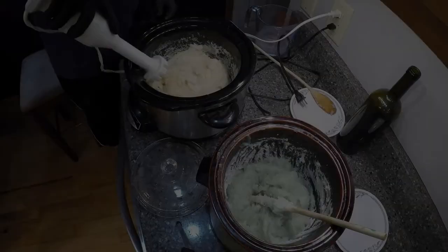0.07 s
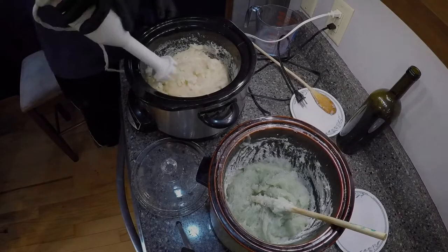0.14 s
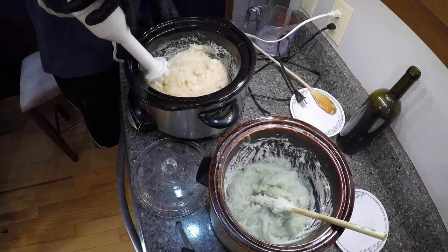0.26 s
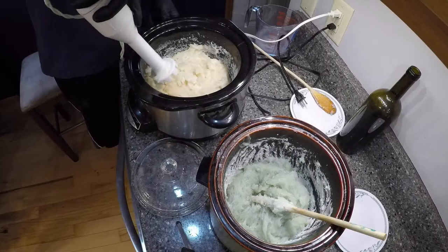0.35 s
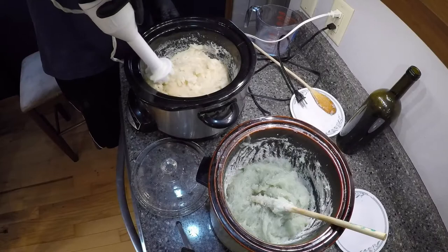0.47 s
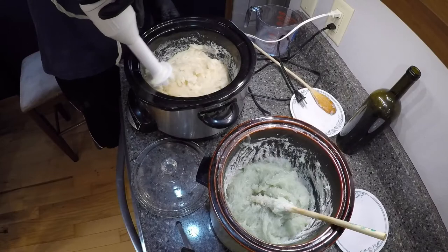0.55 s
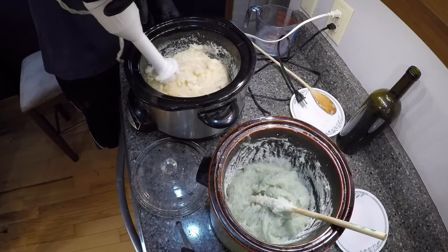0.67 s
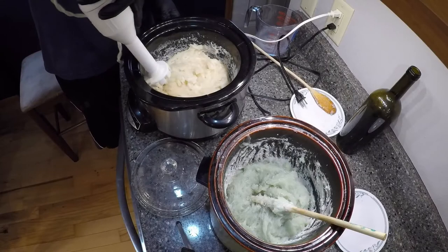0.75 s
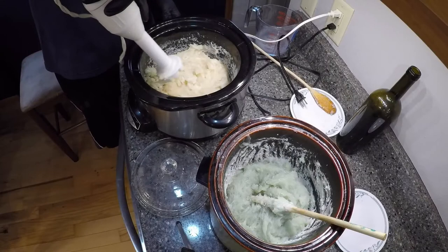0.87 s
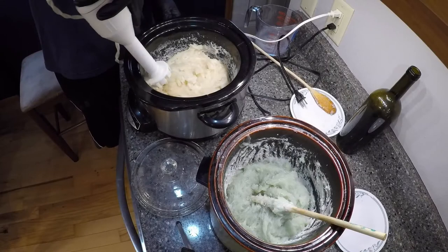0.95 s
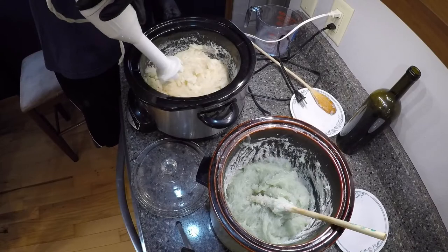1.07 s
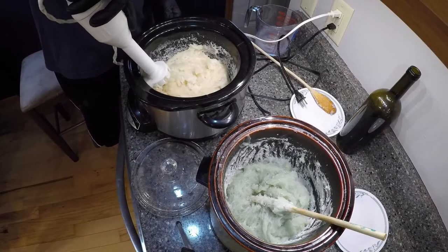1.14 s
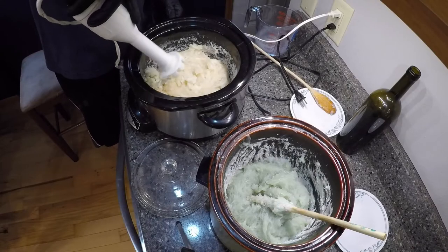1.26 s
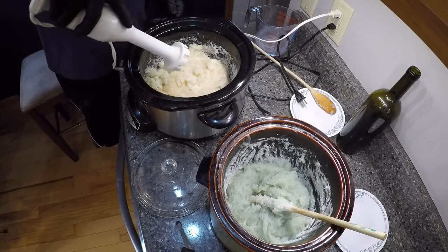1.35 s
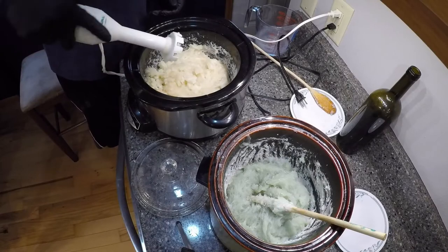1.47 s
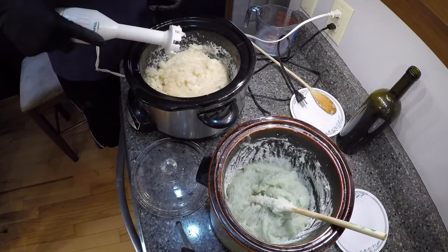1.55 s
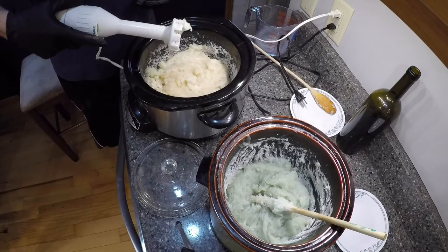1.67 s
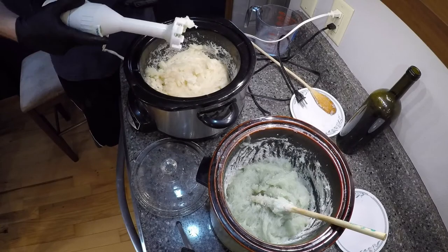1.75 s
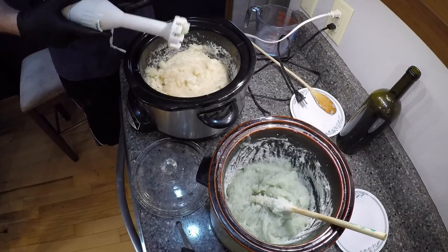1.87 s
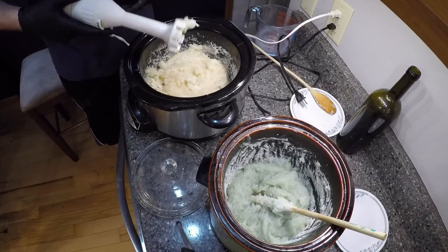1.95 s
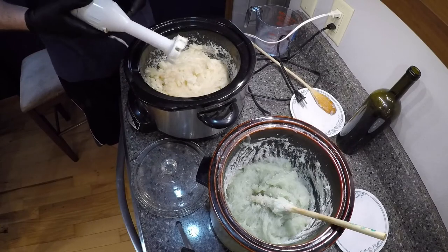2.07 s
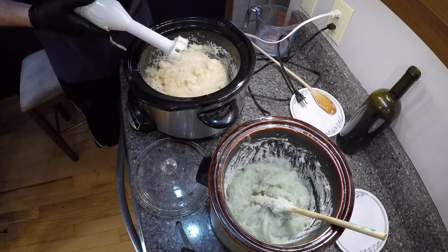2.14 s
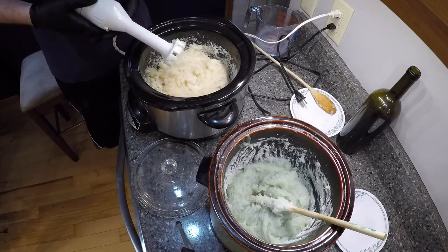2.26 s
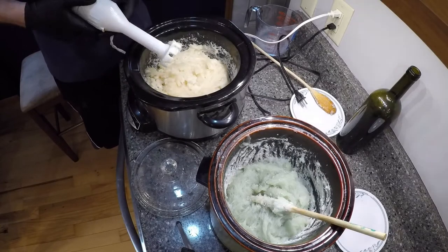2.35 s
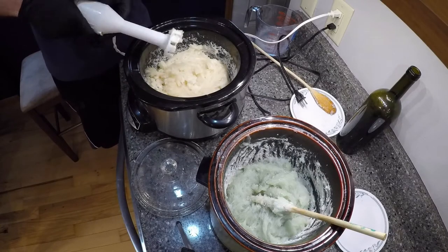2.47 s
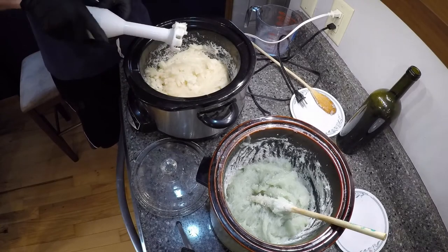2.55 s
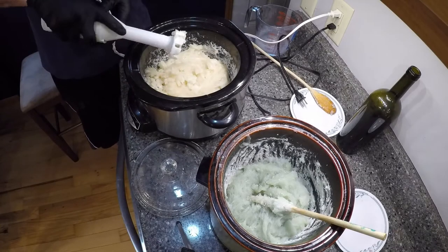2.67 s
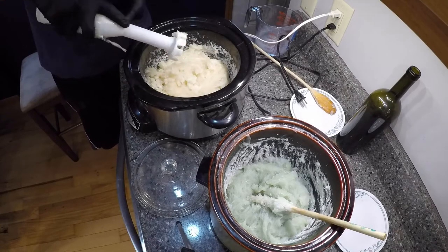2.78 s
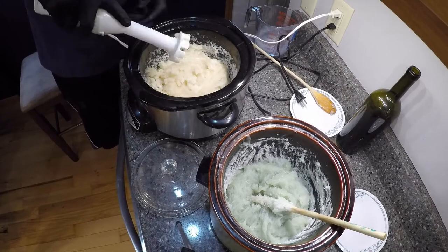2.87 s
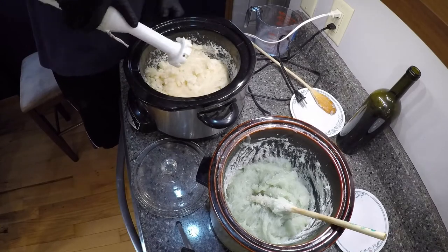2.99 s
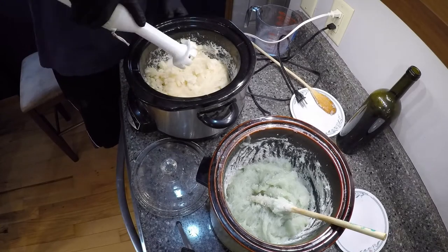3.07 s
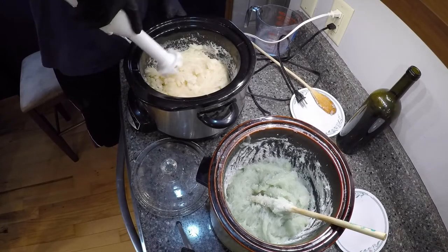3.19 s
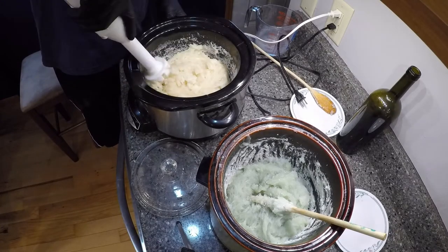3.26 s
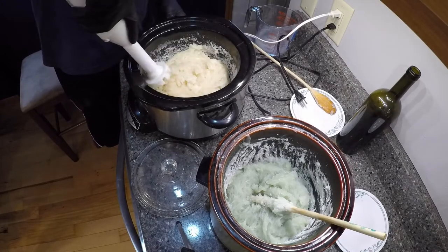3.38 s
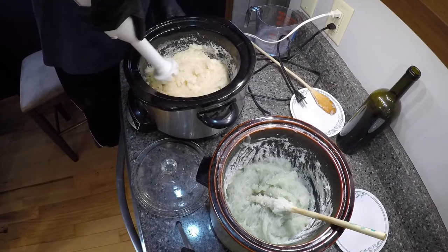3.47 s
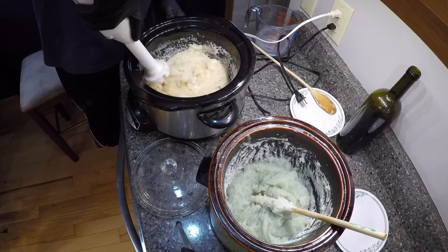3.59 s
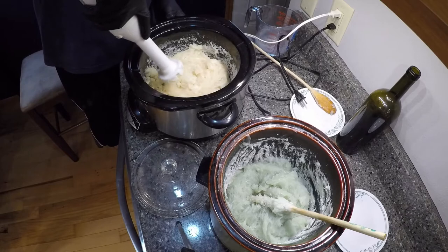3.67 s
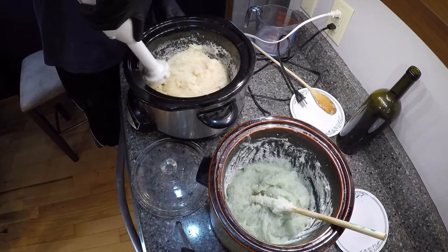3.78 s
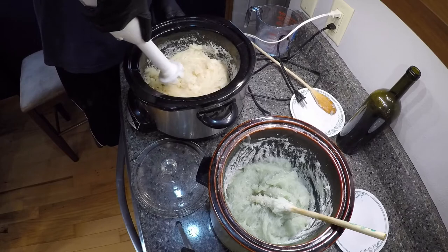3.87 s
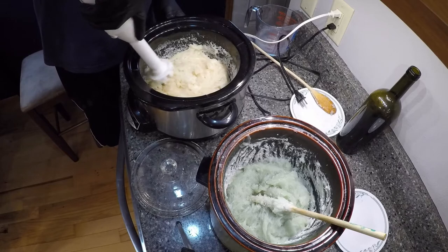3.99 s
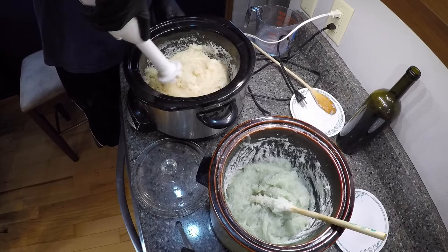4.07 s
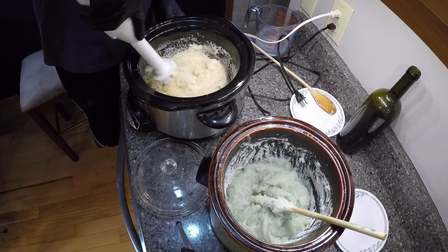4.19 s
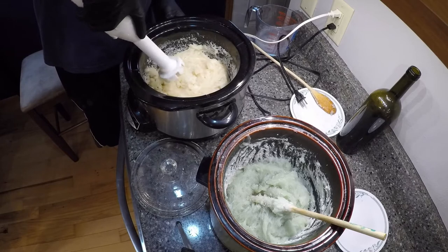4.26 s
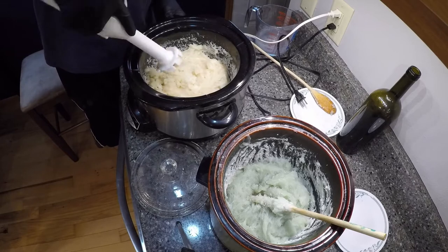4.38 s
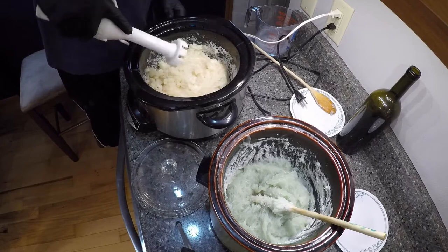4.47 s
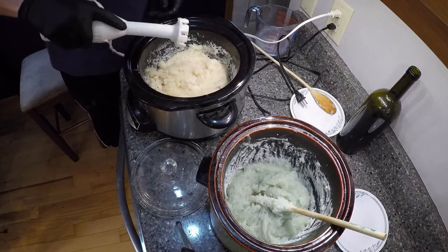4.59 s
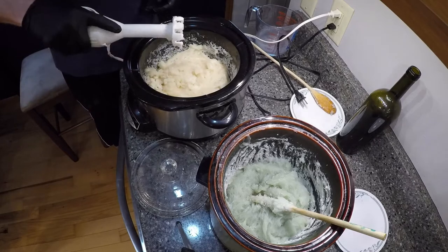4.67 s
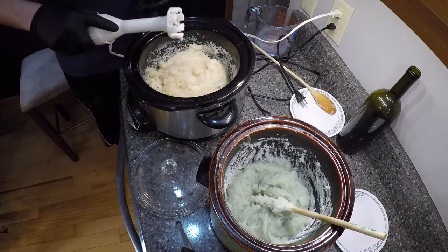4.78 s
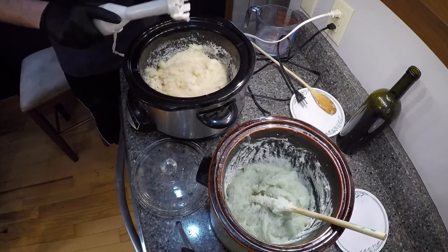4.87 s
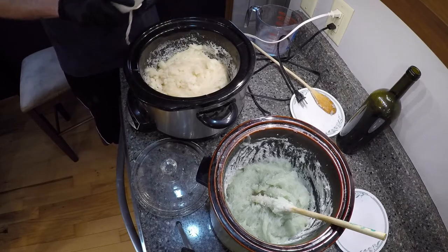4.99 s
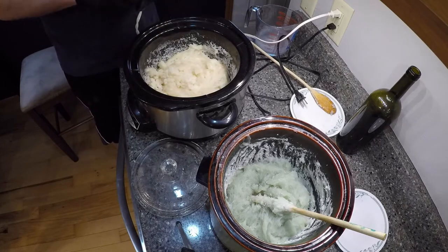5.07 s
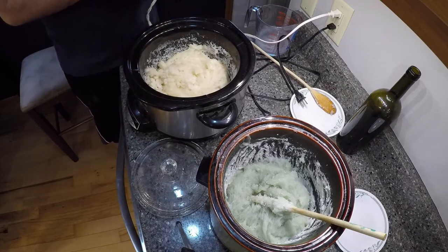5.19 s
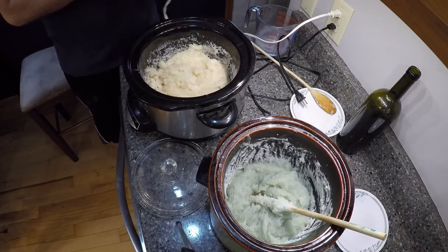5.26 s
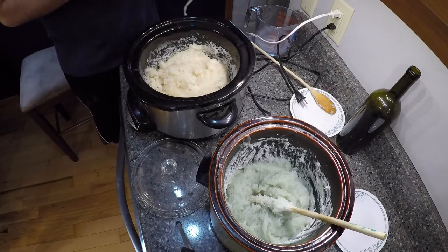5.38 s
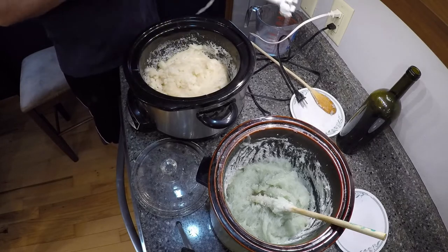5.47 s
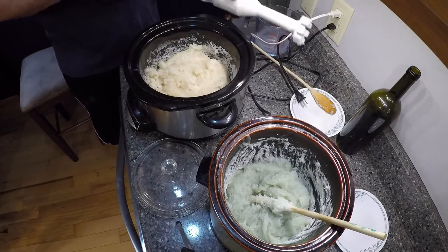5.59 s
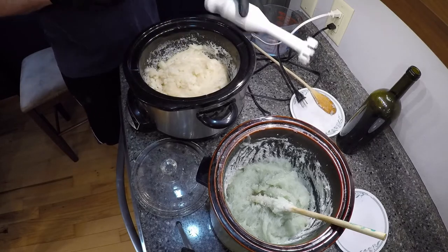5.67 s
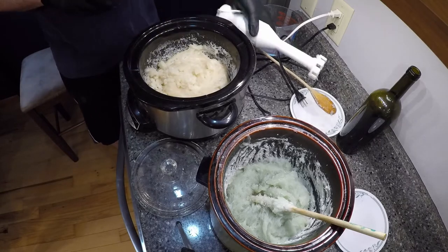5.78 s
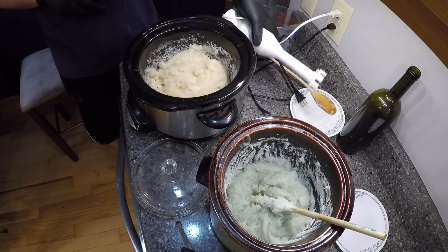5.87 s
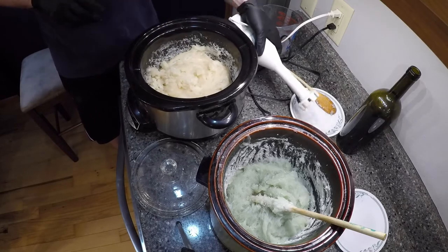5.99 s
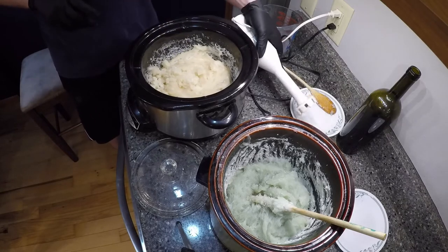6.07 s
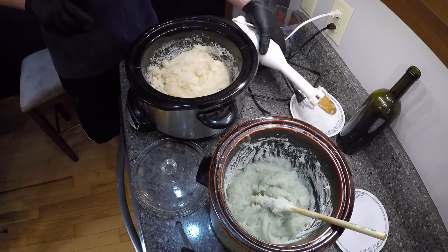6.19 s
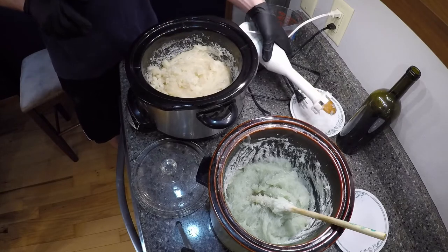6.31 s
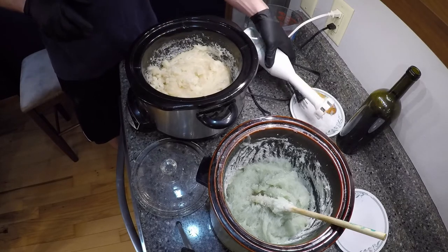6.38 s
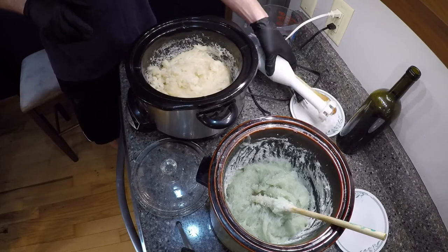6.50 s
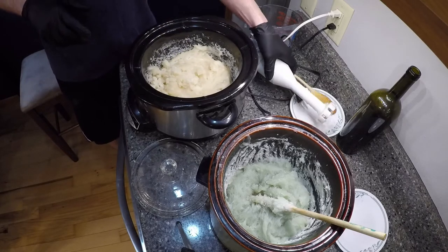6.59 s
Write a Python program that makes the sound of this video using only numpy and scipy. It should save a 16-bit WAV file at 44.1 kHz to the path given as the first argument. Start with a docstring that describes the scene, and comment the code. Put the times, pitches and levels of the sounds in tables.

```python
"""Over a low room hum, a plastic stick blender is knocked clean on the rim of a stoneware pot, in two bursts.
Light taps and rustling cloth and gloves fill the gaps; a bit of metal is brushed and the blender laid down.
Blows are decaying sine modes over filtered noise bursts, and noise tails let the kitchen answer them.
The counter carries the blows into the mount, which shakes the two microphones in opposite sense.
Hum and rustle are coloured noise; a gain control then ducks everything above the bass on loud sounds."""
import sys
import numpy as np
from scipy import signal
from scipy.fft import rfft, irfft
from scipy.io import wavfile
from scipy.ndimage import uniform_filter1d

SR = 44100
rng = np.random.default_rng(int(sys.argv[2]) if len(sys.argv) > 2 else 0)


def to_wav(sig):
    """Store sig (one row per channel, or 1-D mono) as 16-bit WAV at the path in sys.argv[1].

    Samples outside -1..1 are clipped; the rate is SR.
    """
    pcm = np.clip(np.atleast_2d(sig), -1, 1) * 32767
    pcm = np.round(pcm).astype(np.int16)
    wavfile.write(sys.argv[1], SR, pcm.T)  # frames by channels


N = 292723

# Blows on the rim. Each row: start in seconds, strongest rim modes in dB, peak in dB, left over right in dB,
# send to the walls in dB against the peak, brightness of that send in dB an octave,
# thump of the pot on the counter in dB, jolt of the mount in dB, wobble of the mount in dB.
KNOCKS = [(0.065, -8.5, -9.5, 2.5, 2, 0.5, -31, -25.5, -25.5),
          (0.233, -1, -6, 5, 8, 0.1, -23.5, -17.5, -20.5), (0.385, -0.5, -6, 7.5, 10, 0.7, -24.5, -14, -28),
          (0.561, 1.5, -4.5, 4.5, 8.5, 0.76, -23, -13, -29), (0.747, -1, -3, 4.5, 7, 0.6, -24, -12, -25),
          (0.946, -1.5, -4, 4.5, 8.5, 1.3, -22.5, -13.5, -20),
          (1.127, -1, -3.5, 5, 8, 1.4, -21, -10.5, -18), (3.243, -2.5, -7, 4.5, 8.5, 0.4, -35, -19, -54),
          (3.382, 1.5, -3.5, 3.5, 8.5, 0.4, -41, -13, -52),
          (3.567, -0.5, -4.5, 3, 11.5, 0.6, -39, -13.5, -50),
          (3.742, -1, -3.5, 3.5, 10, 0.9, -42, -15.5, -48), (3.923, -0.5, -3, 4.5, 9.5, 0.4, -48, -19, -32),
          (4.111, -1, -3.5, 3, 9, 0.7, -36, -20, -28)]
# The heavy end lands on the counter, then settles. Each row: start in seconds, peak in dB,
# left over right in dB, contact noise in dB against the ring, send to the walls in dB against the peak,
# counter thump in dB, jolt in dB, wobble in dB.
LANDING = [(5.656, -9.5, 2.5, 8, 8, -39, -4.5, -38), (5.731, -27.5, 2, -14, -12, -34, -40, -50),
           (5.984, -32, 2, 2, 8.5, -23, -8, -14.5)]
# Restless bass between blows. Each row: time in seconds, wobble in dB, rumble common to both sides in dB.
SWAY = [(0, -52, -51.5), (1.3, -34, -51), (1.6, -52, -49.5), (2.24, -62.5, -57.5), (2.8, -68, -66),
        (3.3, -53, -73), (4.4, -53, -58.5), (4.8, -64, -63.5), (5.5, -79, -71), (6.0, -55, -42.5),
        (6.64, -48, -53.5)]
# Spectrum of wobble and rumble. Each row: frequency in Hz, level in dB per Hz.
DEEP = [(15, 0.5), (35, -1), (62, 6.5), (90, -6.5), (108, 3), (200, -84)]
# Spectrum of a light contact. Each row: frequency in Hz, level in dB per Hz.
TICK = [(300, -14), (1000, 3), (2500, 4.5), (4800, -1.5), (6500, 0.5), (8500, -14.5), (12000, -26),
        (16000, -41)]


def amp(db):
    """Turns dB into a linear gain."""
    return 10 ** (np.asarray(db) / 20)


def evened(x):
    """Scales a signal to rms 1."""
    return x / np.sqrt(np.mean(x ** 2) + 1e-20)


def read(table, hz, axis=1):
    """Reads one column of a spectrum at the given frequencies, interpolating over log frequency."""
    table = np.array(table)
    return np.interp(np.log(hz + 1), np.log(table[:, 0] + 1), table[:, axis])


def follow(table, axis):
    """Reads one column of a level curve as a gain for every sample."""
    table = np.array(table)
    return amp(np.interp(np.arange(N) / SR, table[:, 0], table[:, axis]))


def add(mix, s, db, sound, pan_db=0):
    """Adds a two-row sound at s seconds, the peak of its channel mean brought to db before panning."""
    part = mix[:, round(s * SR):][:, :sound.shape[1]]
    gain = amp(db + pan_db * np.array([[.5], [-.5]]))
    part += gain * sound[:, :part.shape[1]] / abs(sound.mean(0)).max()


def coloured(table, size, channels=1):
    """Noise of rms 1 with the given spectrum."""
    z = rfft(rng.standard_normal((channels, size)))
    gain = amp(read(table, np.fft.rfftfreq(size, 1 / SR)))
    return evened(irfft(z * gain, size))


def click(table):
    """A causal, minimum-phase click with the given spectrum and energy 1."""
    level_db = np.maximum(read(table, np.fft.rfftfreq(4096, 1 / SR)), -100)
    half = np.log(amp(level_db))
    full = np.concatenate([half, half[-2:0:-1]])
    minimum_phase = np.exp(signal.hilbert(full).conj())
    shape = np.fft.ifft(minimum_phase).real[None, :2048]
    return shape / np.linalg.norm(shape)


def ringing(modes, size, rise, spread_db=0.3, apart=0.68):
    """Decaying modes struck together, a little apart in phase at each microphone."""
    hz, db, t60 = np.transpose(modes)[:, :, None]
    level, phase, other = rng.standard_normal((3, len(modes), 1))
    t = np.arange(size) / SR
    decay_db = 60 * t / np.clip(t60, .01, .35)
    level = amp(db + spread_db * level - decay_db)
    ring = [(level * np.sin(2 * np.pi * hz * t + 1.03 * phase + side * apart * other)).sum(0)
            for side in (0, 1)]
    return np.array(ring) * (1 - np.exp(-t / rise)) ** 2


def tilted(table, treble_db):
    """Brightens a spectrum or a set of modes by so many dB an octave, pivoting at 2 kHz."""
    return [(hz, db + treble_db * np.log2(hz / 2000), *rest) for hz, db, *rest in table]


def blow(modes, colour, crack_db, crack_t60, size=12000):
    """A modal ring over a decaying burst of contact noise, partly shared by both sides."""
    noise = rng.standard_normal((3, size))
    fade = amp(-60 * np.arange(size) / SR / crack_t60)
    burst = (noise[0] + 1.37 * noise[1:]) * fade
    crack = signal.oaconvolve(burst, click(colour), axes=1)[:, :size]
    return ringing(modes, size, 0.00029) + amp(crack_db) * crack


def hum():
    """The steady floor of house and microphones: coloured noise, swelling a little, and wavering tones."""
    # Spectrum common to both sides. Each row: frequency in Hz, level in dB per Hz.
    mid_colour = [(59, -40.5), (100, -27), (140, 0), (335, -4), (558, -9), (768, -17.5), (1030, -17.5),
                  (2630, -24.5), (3400, -24), (4570, -28.5), (5300, -24.5), (7290, -26.5), (12100, -36),
                  (14100, -41), (16000, -74)]
    # Spectrum opposed between the sides. Each row: frequency in Hz, level in dB per Hz.
    side_colour = [(35, -44), (60, -18), (91, -14.5), (172, -0.5), (1250, -13), (3040, -29.5), (3670, -35),
                   (4030, -44), (4750, -32), (7230, -26.5), (12400, -38), (14600, -48), (16000, -62)]
    # A far appliance. Each row: frequency in Hz, rms level in dB.
    drone = [(118.4, -72), (150.7, -61.5), (317.6, -62.5)]
    mid_db, side_db = -50.5, -48
    swell = amp(evened(uniform_filter1d(rng.standard_normal((2, N)), 3000)))  # 1 dB rms
    mid = amp(mid_db) * coloured(mid_colour, N)[0] * swell[0]
    for hz, db in drone:
        waver = 1 + 0.0046 * evened(uniform_filter1d(rng.standard_normal(N), 8000))
        mid = mid + amp(db) * np.sqrt(2) * np.sin(2 * np.pi * hz * np.cumsum(waver) / SR)
    side = amp(side_db) * coloured(side_colour, N)[0] * swell[1]
    return np.array([mid + side, mid - side])


def shakes():
    """Everything that shakes the mount, as rows of time, jolt and wobble."""
    # Bumps on the counter that only shake the mount. Each row: start in seconds, jolt in dB, wobble in dB.
    bumps = [(1.676, -24, -44), (2.207, -26, -48), (2.929, -29, -38), (2.999, -22.5, -58),
             (4.643, -26, -62), (4.763, -33, -63.5), (5.517, -22.5, -65), (5.674, -18, -43),
             (5.711, -23, -23), (5.828, -28, -32), (5.865, -31.5, -30), (6.039, -30, -15.5),
             (6.147, -35, -36), (6.3, -54, -36), (6.411, -50, -39)]
    return [(row[0], *row[-2:]) for row in KNOCKS + LANDING + bumps]


def settling(rest, rise_s, t60, gain_db=0):
    """A level that swells after every shake and dies back to its rest, summed as power."""
    clock = np.arange(0, N, 32) / SR  # every 32 samples is fine enough
    s, _, wobble_db = np.transpose(shakes())[:, :, None]
    t = np.maximum(clock - s, 0)
    swing = amp(wobble_db + gain_db - 60 * t / t60) * (1 - np.exp(-(t / rise_s) ** 2))
    power = (swing ** 2).sum(0)
    return np.sqrt(rest ** 2 + np.interp(np.arange(N) / SR, clock, power))


def wobble():
    """The mount swings out after a blow and settles: deep noise under a swelling level."""
    level = settling(follow(SWAY, axis=1), rise_s=0.018, t60=0.53)
    return coloured(DEEP, N) * level * amp([[-1.4], [1.4]])  # right side stronger


def rumble():
    """The share of the deep noise common to both microphones, quicker to rise and settle."""
    return coloured(DEEP, N) * settling(follow(SWAY, axis=2), rise_s=0.0072, t60=0.15, gain_db=-17)


def jolts():
    """Blows reach the mount through the counter; its modes swell over a few cycles and ring out."""
    # Ring of the mount. Each row: frequency in Hz, level in dB, t60 in seconds.
    mount_modes = [(248.3, 9.5, 0.065), (194.4, -8.5, 0.24), (155.7, -4, 0.12), (558, 1, 0.038)]
    lag_s = 0.00812
    out = np.zeros((2, N))
    for s, jolt_db, _ in shakes():
        add(out, s + lag_s, jolt_db, ringing(mount_modes, 16000, 0.009, apart=0.22), -.8)
    return out


def mount():
    """Jolts and wobble shake the two microphones in opposite sense; rumble moves both alike."""
    return (jolts() + wobble()) * [[1], [-1]] + rumble()


def struck(burst, pair_db):
    """The pot's modes as one blow wakes them: each lands elsewhere, so levels and pitches scatter."""
    # Rim and shaft ringing. Each row: frequency in Hz, level in the first burst in dB,
    # level in the second burst in dB, t60 in seconds (ringing holds it at 0.35 or less).
    pot_modes = [(454, -9.5, -13, 0.11), (502, -9, -12, 0.088), (536, -12, -4.5, 0.081),
                 (590, -27, -21, 0.37), (774, -12.5, -15, 0.18), (857, -23, -21, 0.36),
                 (930, -30, -23, 0.33), (971, -6.5, -11.5, 0.074), (1030, -15, -13, 0.092),
                 (1242, -13, -6.5, 0.053), (1397, -14.5, -11.5, 0.16), (1621, -22, -3, 0.04),
                 (1833, -24, -3, 0.072), (2144, 5, 0, 0.046), (2321, 5, 5, 0.038), (2510, -40, -5.5, 0.053),
                 (2640, -3, -21, 0.024), (3200, -9.5, -30, 0.046), (3417, -6, -11, 0.037),
                 (3595, -6.5, -8, 0.042), (3804, -10, -7, 0.0383), (4597, -10.5, -11.5, 0.027),
                 (6080, -11, -21, .06), (6984, -11, -11.5, 0.036), (7515, -4.5, -4, 0.012)]
    spread_db, detune = 1.0, .002  # standard deviations; detune is a fraction of the pitch
    pair_low_hz, pair_high_hz = 2000, 2550  # where the strongest rim modes lie
    level, tune = rng.standard_normal((2, len(pot_modes)))
    modes = []
    for row, a, b in zip(pot_modes, level, tune):
        boost_db = pair_db * (pair_low_hz < row[0] < pair_high_hz)
        modes.append((row[0] * (1 + detune * b), row[1 + burst] + spread_db * a + boost_db, row[3]))
    return modes


def knocks(direct, sent):
    """Rim blows: ring and contact noise, brighter when harder, and the pot bouncing on its feet."""
    # Contact noise. Each row: frequency in Hz, level in dB per Hz.
    crack = [(260, -31), (450, -18), (1260, -3.5), (2330, -4.5), (3050, -27), (3700, -8), (5060, -19.5),
             (5970, -3), (7580, -22), (10000, -28), (13400, -46.5), (16000, -43)]
    # The pot bouncing on its feet. Each row: frequency in Hz, level in dB, t60 in seconds.
    feet = [(177.7, 10.5, 0.024), (101, -8.5, 0.11)]
    # Sent to the walls, one spectrum for each burst, as the shaft meets the rim elsewhere.
    # Each row: frequency in Hz, level in dB per Hz.
    wash = [(210, -43), (350, -23.5), (404, -2.5), (575, -2.5), (696, -17), (830, -5.5), (1040, -12.5),
            (1570, -2), (2200, -4.5), (2580, -10.5), (3180, -8), (3650, -11), (3900, -13.5), (4500, -19.5),
            (6300, -14.5), (7800, -20.5), (8700, -25), (12600, -38), (16000, -69)], [(210, -26.5),
            (350, -11.5), (411, -7.5), (530, -7), (584, -1), (685, -14.5), (885, -5.5), (1260, -9),
            (2200, -2.5), (2580, -10), (3000, -10.5), (3350, -6.5), (3650, -11.5), (3900, -14), (4600, -19),
            (6330, -16), (7800, -19.5), (8700, -25.5), (12600, -39), (16000, -77)]
    for s, pair_db, db, pan_db, wet_db, bright_db, thump_db, *_ in KNOCKS:
        burst = int(s > 2)
        treble_db = 3 + 0.4538 * db  # dB an octave
        modes = tilted(struck(burst, pair_db), treble_db)
        add(direct, s, db, blow(modes, tilted(crack, treble_db), -2, .018), pan_db)
        add(direct, s + 0.00341, thump_db, ringing(feet, 8000, 0.0044, apart=0.11))
        add(sent, s, db + wet_db, click(tilted(wash[burst], bright_db)))


def kitchen(x):
    """Four noise tails, each band dying at its own speed, fade into one another in a repeating cycle."""
    # Each row: frequency in Hz, level in dB, t60 in seconds, left-right likeness from 0 to 1.
    room = [(191, 10, 0.16, 0.83), (362, 8.5, 0.31, 0.85), (480, -1.5, 0.56, 1), (800, 5.5, 0.51, 0.011),
            (1180, 4.5, 0.48, 0.4), (1590, 1.5, 0.45, 0.57), (2340, 3.5, 0.42, 0.27), (3300, 1, 0.44, 0.76),
            (4100, -1, 0.44, 0.74), (6500, 4.5, 0.43, 0.044), (11700, 3.5, 0.27, 0)]
    tails, tails_per_s = 4, 5.3  # cycling through the tails varies the echo
    hz, t, z = signal.stft(rng.standard_normal((2, tails, SR // 2)), SR, nperseg=256)
    same = np.clip(read(room, hz, axis=3), -1, 1)[:, None]
    z = np.array([z[0], same * z[0] + np.sqrt(1 - same ** 2) * z[1]])
    decay_db = 60 * t / read(room, hz, axis=2)[:, None]
    tail = signal.istft(z * amp(read(room, hz)[:, None] - decay_db), SR, nperseg=256)[1]
    tail *= np.clip((np.arange(tail.shape[2]) / SR - .003) / 0.0019, 0, 1)  # first walls answer late
    turn = np.arange(N) * tails_per_s / SR - np.arange(tails)[:, None]
    away = abs(turn % tails - tails / 2)
    feed = x.mean(0) * np.cos(np.pi / 2 * np.minimum(away, 1))
    return signal.fftconvolve(feed[None], tail / np.linalg.norm(tail[0, 0]), axes=2).sum(1)[:, :N]


def faint_taps():
    """Ticks too faint to point at, scattered in time, pitch and strength, as rows like those of taps."""
    count, middle_db, low_hz, high_hz = 12, -49, 1200, 3600
    rows = []
    for when, size, pitch in rng.random((count, 3)):
        db = middle_db + 4.8 * (size - .5)
        hz = low_hz * (high_hz / low_hz) ** pitch
        rows.append((when * N / SR, db, hz, 1.5, -11, 0.025, -2.5, 1.5))
    return rows


def taps(direct, sent):
    """Small taps, bounces and scuffs: one short mode over a burst of light contact noise."""
    # Each row: start in seconds, peak in dB, ring in Hz, left over right in dB, ring in dB,
    # contact t60 in seconds, send to the walls in dB against the peak, brightness in dB an octave.
    tap_rows = [(0.337, -19.5, 1820, 0, -16, 0.1, 6, -1), (0.503, -22.5, 1580, -1, -5, 0.07, 7, -3),
                (0.578, -15.5, 1460, 1, 10, 0.018, -3, 0.1), (1.5447, -50, 2070, -17, -15, 0.031, -29.5, 7),
                (1.766, -41.5, 3580, 2, -11, .012, -3, 3), (2.066, -42.5, 2370, 0, -10, .012, -3, -2),
                (2.106, -43, 1850, 7, -19, 0.023, -3, -4), (2.459, -46, 3300, 2, -10, .012, -3, 1.5),
                (2.486, -42, 6200, 9, -5, 0.04, 16, 1.5), (2.63, -23.5, 1840, 7, -8, 0.042, 4, 1.5),
                (2.64, -33.5, 1790, 9, 14, .015, -3, -1), (2.802, -47, 5600, 5, -10, .015, -3, 1.5),
                (2.865, -47.5, 5770, 6, -16, .015, -1, 2), (2.972, -45, 3300, 1.5, -19, 0.014, -5, 7),
                (3.0008, -38.5, 3180, 0, -13, 0.02, 10, -3),
                (3.0246, -26.5, 2820, 1.5, -16, 0.054, 7, -0.5), (3.211, -41, 3000, 1.5, -12, .015, 6, 3),
                (4.482, -46, 6000, 1.5, -12, .012, -3, 15), (4.594, -31, 3160, 0, -15, 0.0096, 0, 6.5),
                (4.655, -45, 2310, 1.5, -5, .015, -5, -6), (4.687, -51, 2520, 1.5, -12, .012, -3, -1.5),
                (4.811, -44, 6200, 1.5, -15, 0.011, -3, 12), (4.918, -41.5, 2320, 2.5, -10, 0.065, 12, -3),
                (4.94, -42, 6600, 2.5, -14, 0.02, -2, 3), (4.966, -31, 1610, 4, -8.5, 0.03, -3, 4),
                (5.365, -43, 1220, -2, -6, 0.025, -3, 0), (5.46, -42, 1954, 2, -4, 0.02, 10, -3.5),
                (5.4605, -47, 3300, 0, 3, .012, -3, -2), (5.482, -46, 1810, 4, -2, 0.014, -3, -7),
                (5.526, -42.5, 1460, -1.5, -6, 0.028, 9, -10.5), (5.529, -48, 2150, -1.5, 0, 0.015, -3, -5),
                (5.6114, -38, 1180, 4, -4, 0.033, -3, 2), (5.618, -33, 1690, 4, -17, 0.043, 12.5, 0),
                (5.6605, -15, 2100, 2, -6, 0.018, -7, -0.5), (5.664, -20, 1620, 3, -5, 0.014, -8, 1.5),
                (5.832, -34.5, 2710, 1, -2, 0.045, -3, -2.5), (5.953, -47, 3950, -1, -3, .03, -3, 0),
                (5.962, -46, 3650, 1, -3, .03, -3, -1.5), (5.969, -41, 3400, -1, 0, 0.04, 2, -4)]
    ring_t60 = 0.028  # seconds
    for s, db, hz, pan_db, ring_db, contact_t60, wet_db, bright_db in tap_rows + faint_taps():
        colour = tilted(TICK, bright_db)
        tap = blow([(hz, ring_db, ring_t60)], colour, -12.5, np.clip(contact_t60, .004, .3))
        add(direct, s, db, tap, pan_db)
        add(sent, s, db + wet_db, click(colour))


def rustle():
    """Cloth and gloves: clumped grains of noise under strokes that swell and fade."""
    # Each row: loudest moment in seconds, peak in dB, swell in seconds, fade in seconds.
    strokes = [(1.9, -60.5, 0.58, 0.083), (2.25, -55.5, 0.19, 0.093), (2.5, -54, 0.26, 0.11),
               (2.66, -48.5, 0.082, 0.11), (3.05, -60, 0.33, 0.11), (4.63, -65, 0.16, 0.16),
               (5.11, -53.5, 0.091, 0.091), (5.17, -56, 0.05, .05), (5.235, -46.5, 0.057, 0.051),
               (5.36, -64, 0.11, 0.4)]
    # Spectrum of cloth. Each row: frequency in Hz, level in dB per Hz.
    cloth = [(590, -21), (1000, -1), (1110, -33), (2030, -8.5), (3710, 0), (4710, -4.5), (7060, 1.5),
             (12000, -19), (15600, -52), (22000, -120)]
    stroke_db = -13.5  # how far a stroke is down one swell before and one fade after its peak
    grain = amp(2.5 * evened(uniform_filter1d(rng.standard_normal(N), 400)))
    noise = coloured(cloth, N, channels=3)
    t = np.arange(N) / SR
    power = 0
    for s, db, swell, fade in strokes:
        power = power + amp(db + stroke_db * np.maximum((s - t) / swell, (t - s) / fade)) ** 2
    return evened((noise[0] + noise[1:]) * grain) * np.sqrt(power)


def after_ring(direct):
    """One tap leaves a lower part ringing in its own modes."""
    # Each row: start in seconds, peak in dB, left over right in dB.
    rings = [(3.0271, -27.5, 1.9)]
    # Its ring. Each row: frequency in Hz, level in dB, t60 in seconds.
    low_part = [(1340, -13, .13), (1420, -12, .17), (1500, -7, .2), (1600, -6, .06), (1720, -2, .04),
                (1880, -3, .045), (2160, -5, .045)]
    for s, db, pan_db in rings:
        add(direct, s, db, ringing(low_part, 9000, 0.0013), pan_db)


def clink(direct):
    """A thin piece of metal is brushed and rings in high modes until a touch stops it."""
    # Each row: start in seconds, peak in dB, left over right in dB.
    brushes = [(5.419, -39, 10), (5.4275, -56, 8.9)]
    # Its ring. Each row: frequency in Hz, level in dB, t60 in seconds.
    metal = [(2740, -17, 0.28), (6380, -0.5, 0.24), (6560, -9, .07), (7240, -10, .12), (8120, -15.5, .25),
             (9300, -20, .08)]
    damped_s, damping_s = 0.068, 0.006  # touch after the brush, and its time constant
    for s, db, pan_db in brushes:
        touched_for = np.maximum(np.arange(12000) / SR - damped_s, 0)
        add(direct, s, db, blow(metal, TICK, -14.0, .02) * np.exp(-touched_for / damping_s), pan_db)


def landing(direct, sent):
    """The blender is laid down: its body rings over contact noise, and the counter thumps."""
    # Ring of the body. Each row: frequency in Hz, level in dB, t60 in seconds.
    body = [(365, 2, 0.22), (416, 6.5, 0.16), (455, 10.5, 0.1), (555, 1, 0.12), (660, -1.5, 0.21),
            (770, -2, 0.11), (956, -9, .12), (1285, -7.5, 0.15), (1605, -4, 0.11), (1930, -3, 0.098),
            (2100, -16, 0.07), (2840, -6, 0.045)]
    # Contact noise. Each row: frequency in Hz, level in dB per Hz.
    slap = [(180, -42), (300, -16), (870, 0), (1170, -18), (2100, -7), (2440, -15.5), (4090, -15.5),
            (6200, -8), (16000, -42)]
    # Ring of the counter. Each row: frequency in Hz, level in dB, t60 in seconds.
    counter = [(156, 1, 0.046), (126, -7.5, 0.15), (252.6, 0, 0.072), (329, -10, 0.062), (579, -10, 0.061)]
    # Sent to the walls. Each row: frequency in Hz, level in dB per Hz.
    thud = [(180, -37), (300, -1.5), (440, -3.5), (600, -6), (800, -13), (1170, -16.5), (1750, -9),
            (2500, -14.5), (3600, -12.5), (5300, -21.5), (7320, -15), (12500, -32), (14000, -45),
            (16000, -101)]
    for s, db, pan_db, crack_db, wet_db, thump_db, *_ in LANDING:
        add(direct, s, thump_db, ringing(counter, 12000, 0.0033, apart=.1))
        add(direct, s, db, blow(body, slap, crack_db, 0.075), pan_db)
        add(sent, s, db + wet_db, click(thud))


def boom(direct):
    """The counter booms under the landing in a few low modes."""
    # Each row: start in seconds, peak in dB.
    booms = [(5.656, -19.5)]
    # Its ring. Each row: frequency in Hz, level in dB, t60 in seconds.
    slab = [(139, -7, .16), (163, 0, .14), (184, -3, .12)]
    for s, db in booms:
        add(direct, s, db, ringing(slab, 9000, .002, apart=.1))


def rocking(direct):
    """The blender rocks as it settles, and short low modes make the counter thump dully."""
    # Each row: start in seconds, peak in dB.
    rocks = [(5.843, -34.5), (5.885, -41), (6.066, -29.5), (6.167, -31)]
    # Its ring. Each row: frequency in Hz, level in dB, t60 in seconds.
    dull = [(61, -0.5, 0.055), (107, 5, 0.061), (163, -6, 0.06)]
    for s, db in rocks:
        add(direct, s, db, ringing(dull, 6000, 0.0027, apart=.1))


def scene():
    """Mixes the direct blows, the answer of the kitchen, the shaken mount, cloth and hum."""
    direct, sent = np.zeros((2, 2, N))  # what arrives directly, and the clicks sent to the walls
    knocks(direct, sent)
    taps(direct, sent)
    after_ring(direct)
    clink(direct)
    landing(direct, sent)
    boom(direct)
    rocking(direct)
    answer = kitchen(sent + 0.3 * direct)  # the walls also return a share of the direct ring
    return hum() + mount() + direct + answer + rustle()


def record(dry):
    """Gain control above the bass ducks loud sounds and recovers slowly; then clipping and a band limit."""
    full_scale, edge_hz = 0.95, 16500
    threshold_db, recovery_db_per_s, attack_s = -24.5, 184.0, 0.013
    high = signal.sosfiltfilt(signal.butter(4, 340, "high", fs=SR, output="sos"), dry)
    power = signal.lfilter([.01], [1, -.99], (high ** 2).mean(0))
    power_db = 10 * np.log10(abs(power) + 1e-12)
    fall = np.arange(N) * recovery_db_per_s / SR
    held_db = np.maximum.accumulate(power_db + fall) - fall  # peaks fall back at a steady rate
    over_db = np.maximum(held_db - threshold_db, 0)
    lag = np.exp(-1 / (attack_s * SR))
    duck_db = 0.67 * signal.lfilter([1 - lag], [1, -lag], over_db)
    ducked = dry - high + high / amp(duck_db)
    clipped = np.clip(ducked, -full_scale, full_scale)
    band_limit = signal.firwin(511, edge_hz, window=("kaiser", 9), fs=SR)
    return signal.oaconvolve(clipped, band_limit[None], "same")


dry = scene()
out = record(dry)
to_wav(out)
```